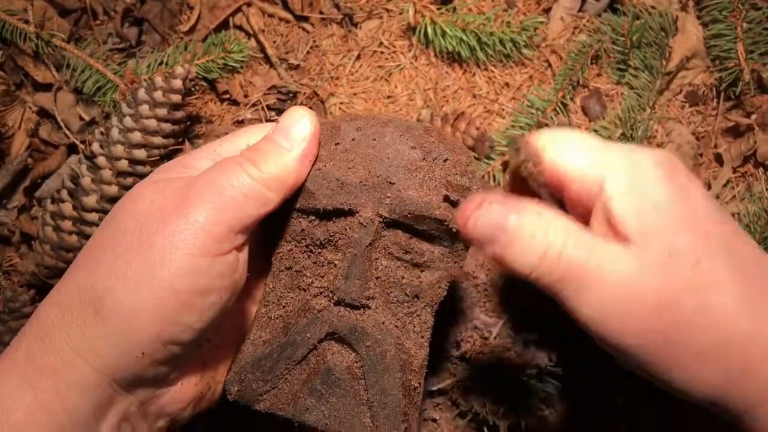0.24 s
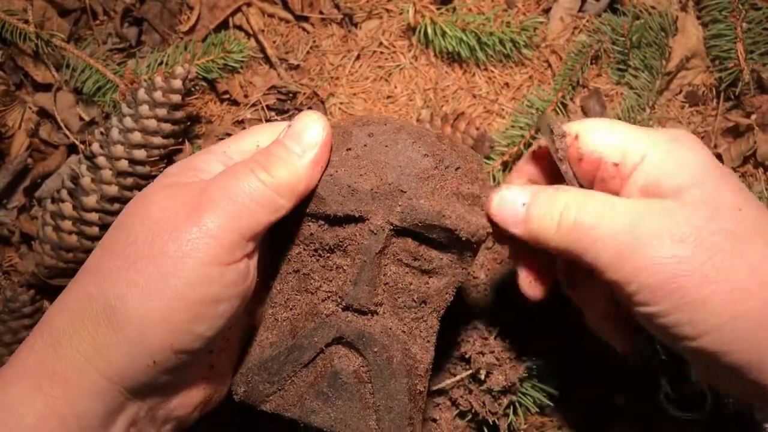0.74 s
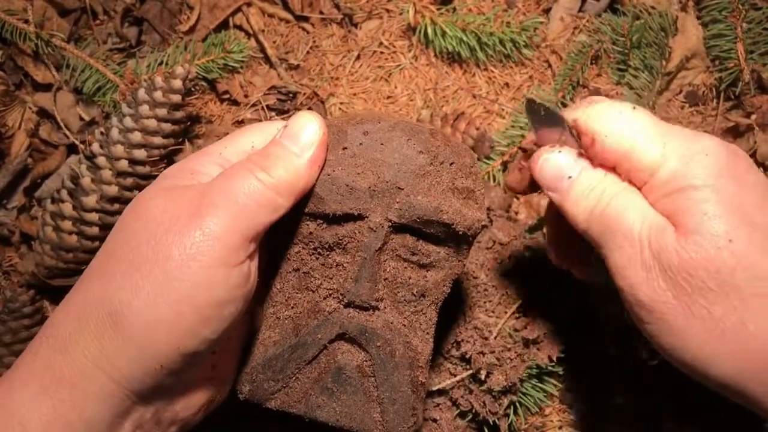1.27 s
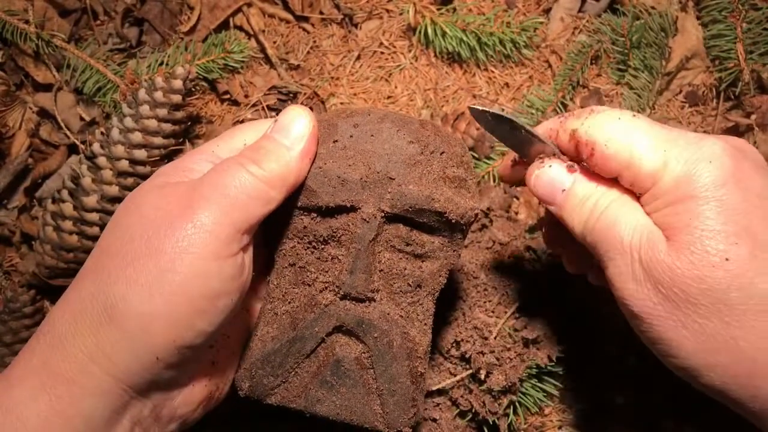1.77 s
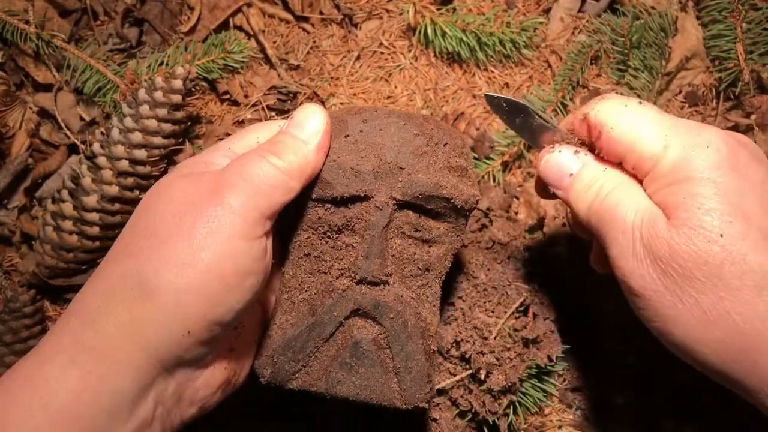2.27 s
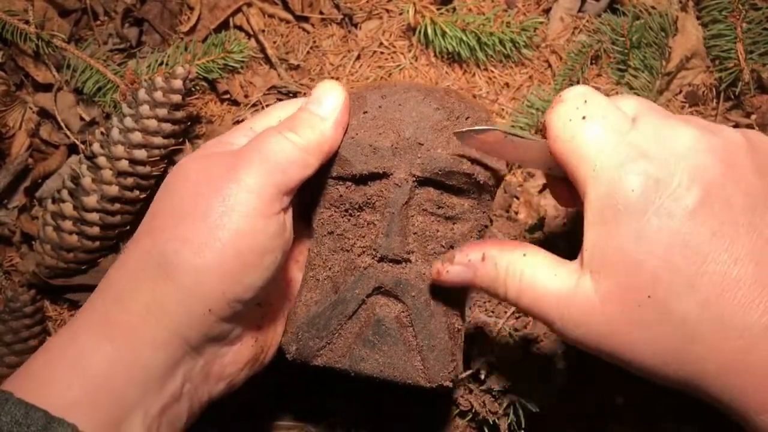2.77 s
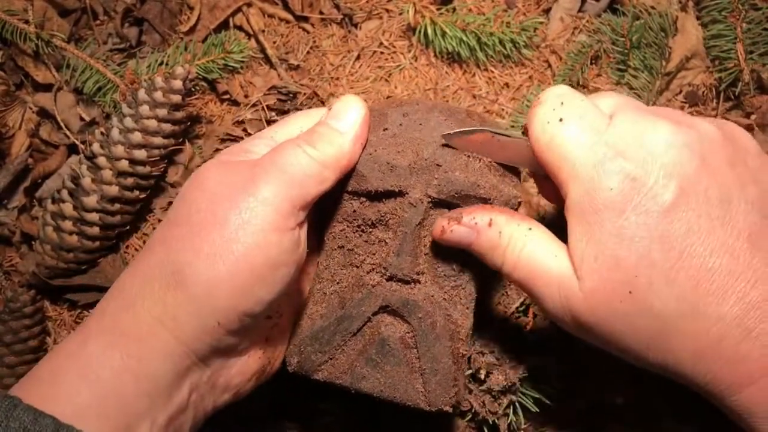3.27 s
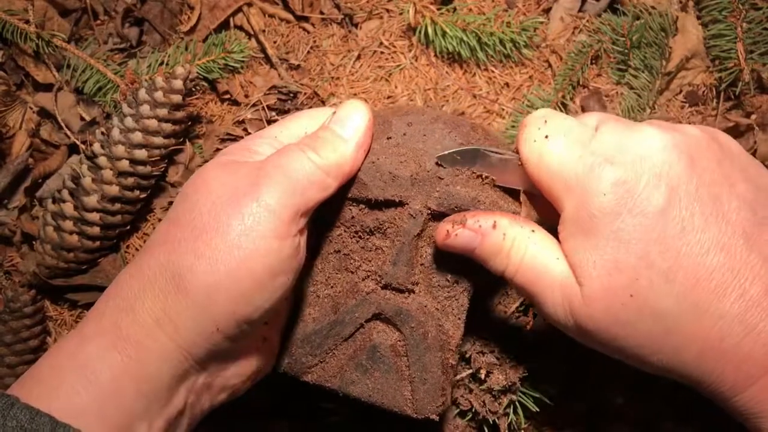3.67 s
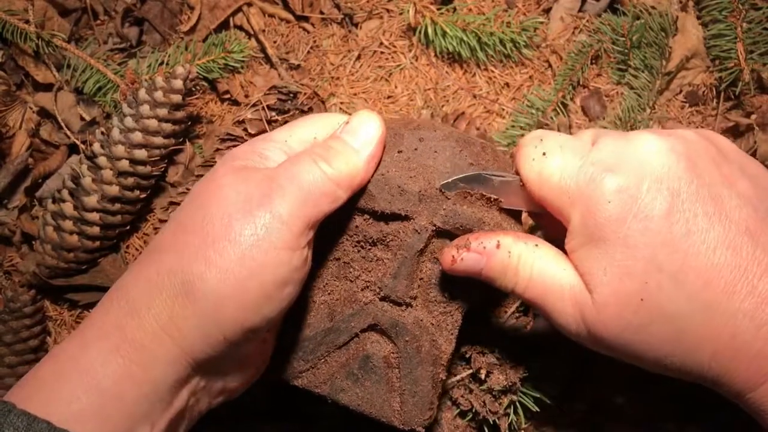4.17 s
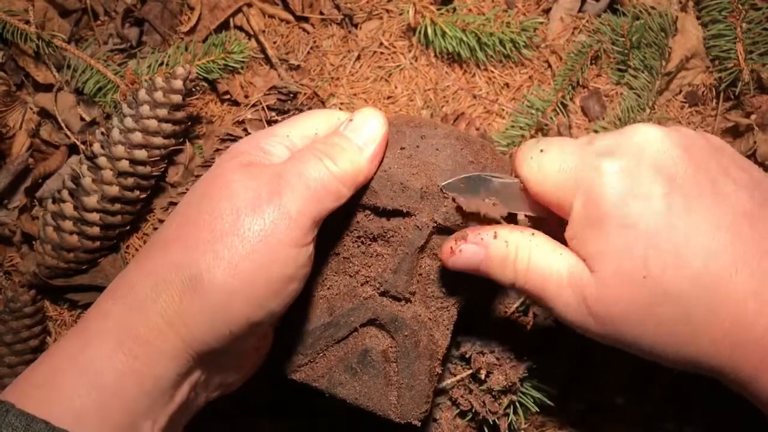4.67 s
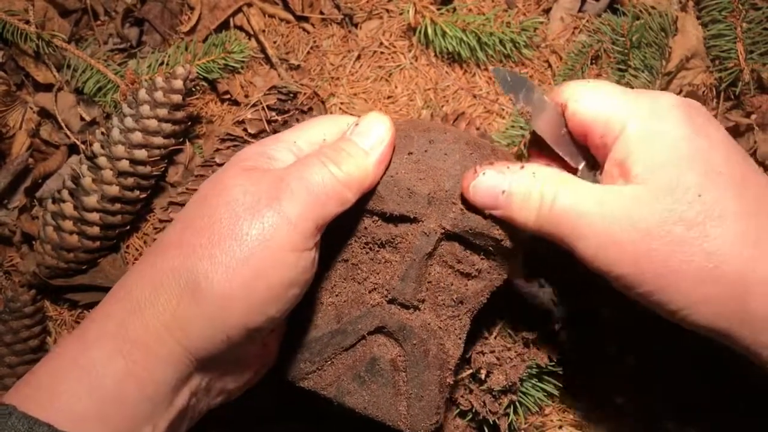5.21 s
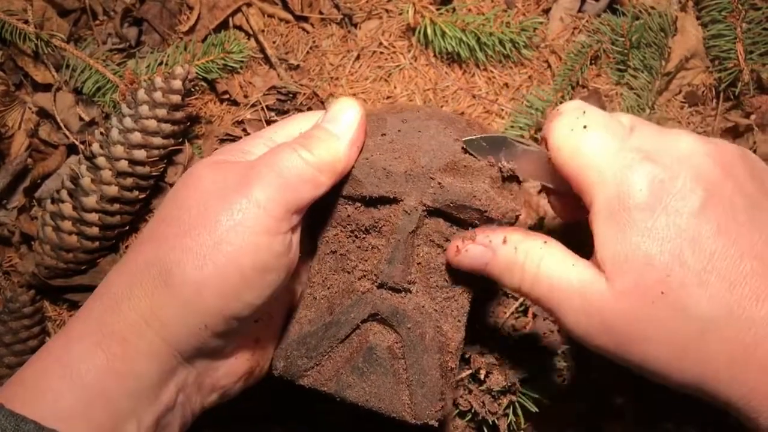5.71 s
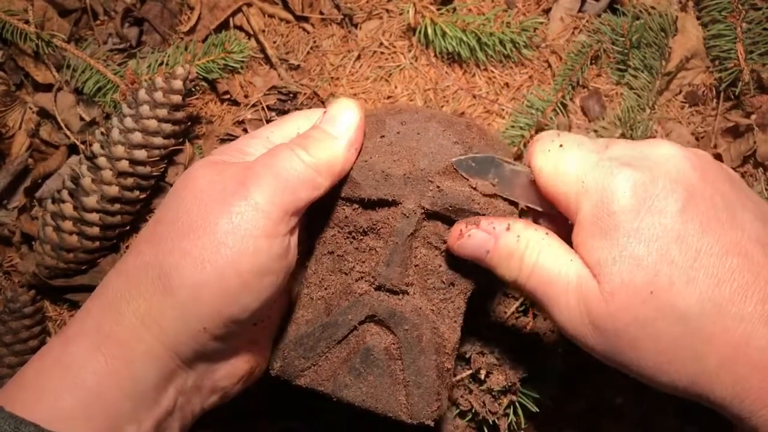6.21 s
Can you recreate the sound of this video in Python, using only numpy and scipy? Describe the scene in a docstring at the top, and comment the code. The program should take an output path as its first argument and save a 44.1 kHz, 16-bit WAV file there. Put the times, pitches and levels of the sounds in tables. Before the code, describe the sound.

A forest stream rushes steadily with small drops plinking and ticking close by, while gusts of wind rumble low against the microphone.

```python
"""In a forest, a stream rushes steadily while gusts of wind buffet the microphone.
The rush is noise shaped like countless merged bubbles, with single ringing bubbles on top.
Nearer by, small drops plink (a ringing bubble) and tick (a dry burst), over a fine patter.
The wind is a low rumble of eddies on the microphone that grows brighter as it blows harder."""
import sys
import numpy as np
from scipy import signal
from scipy.fft import rfft, irfft
from scipy.io import wavfile
from scipy.ndimage import uniform_filter1d

SR = 44100
rng = np.random.default_rng(int(sys.argv[2]) if len(sys.argv) > 2 else 0)


def inscribe(sig):
    """Save sig as 16-bit PCM at rate SR to the path in sys.argv[1].

    A 1-D sig is mono; a 2-D sig holds one channel per row.
    Samples are clipped to [-1, 1] before scaling.
    """
    pcm = np.round(np.clip(np.atleast_2d(sig).T, -1, 1) * 32767)
    wavfile.write(sys.argv[1], SR, pcm.astype(np.int16))


N = 284445  # length in samples


def undb(db):
    """Turn decibels into a gain."""
    return 10 ** (np.asarray(db) / 20)


def unit(x):
    """Scale a signal to an rms of one."""
    return x / np.sqrt(np.mean(x ** 2))


def curve(rows):
    """Join (time in s, value) rows by straight lines."""
    return np.interp(np.arange(N) / SR, *np.transpose(rows))


def spectrum_db(points, hz):
    """Read a level between (pitch_hz, level_db) points, on a log-frequency axis."""
    point_hz, point_db = np.transpose(points)
    return np.interp(np.log(hz + 1e-9), np.log(point_hz), point_db)


def colour(x, points):
    """Filter a signal by a spectrum, with no sound before its cause, so that clicks keep their attack."""
    log_gain = spectrum_db(points, np.linspace(0, SR / 2, N + 1)) * np.log(10) / 20
    # folding the cepstrum forward in time gives the minimum-phase filter
    cepstrum = irfft(log_gain)
    cepstrum[1:N] *= 2
    response = np.exp(rfft(cepstrum[:N], 2 * N))
    return irfft(rfft(x, 2 * N) * response)[:N]


def walk(rate):
    """Wander at random: levels held 1 / rate seconds, then smoothed twice; rms one."""
    hold = int(SR / rate)
    held = np.repeat(rng.standard_normal(N // hold + 1), hold)
    smooth = uniform_filter1d(uniform_filter1d(held, hold), hold)
    return unit(smooth[:N])


def add(out, start_s, sound):
    """Mix a short sound in at a given time."""
    i = int(np.clip(start_s * SR, 0, N - 1))
    out[i:i + len(sound)] += sound[:N - i]


# the colour of the white water: pitch_hz [Hz], level_db [dB per Hz, relative]
RUSH_SPECTRUM = [(100, -3), (250, 1.5), (400, -2.5), (650, -2), (950, 0.5), (1250, -0.1), (1550, -5),
                 (2100, -6), (3200, -16), (5000, -23), (6500, -25), (9000, -31), (13000, -29.5),
                 (16000, -35)]


def rush(flicker_db=1.0, flicker_rate=24):
    """Merged bubbles of the white water: coloured noise in which each size class flickers by itself."""
    wash = rfft(colour(rng.standard_normal(N), RUSH_SPECTRUM))
    hz = np.arange(len(wash)) * SR / N
    # size classes a third of an octave wide; the lowest takes everything below
    size_class = np.round(3 * np.log2(np.maximum(hz, 200) / 200))
    out = np.zeros(N)
    for k in np.unique(size_class):
        band = irfft(wash * (size_class == k), N)
        out += band * undb(flicker_db * walk(flicker_rate))
    return unit(out)


def bubble(hz, ring_s, glide, rise_s):
    """A damped air bubble whose pitch climbs as it nears the surface; its envelope peaks at one."""
    t = np.arange(int(6 * ring_s * SR) + 2) / SR
    shape = (1 - np.exp(-t / rise_s)) * np.exp(-t / ring_s)
    # the pitch climbs by the fraction `glide` in each ring_s
    cycles = hz * (t + glide * t ** 2 / (2 * ring_s))
    return shape / shape.max() * np.sin(2 * np.pi * cycles)


def babble(count=4500, low_hz=600, high_hz=4500, cycles=4, spread_db=3.5, slope_db=-2.0):
    """Single bubbles that stand out of the rush; small ones ring higher, shorter and softer."""
    out = np.zeros(N)
    for when, size, force, life in rng.random((count, 4)):
        hz = low_hz * (high_hz / low_hz) ** size
        ring_s = cycles * (.5 + life) / hz
        # many faint bubbles and a few strong ones; slope_db is per octave
        level_db = -spread_db * np.log(0.0033 + force) + slope_db * np.log2(hz / low_hz)
        add(out, when * N / SR, undb(level_db) * bubble(hz, ring_s, glide=0.0032, rise_s=0.00024))
    return unit(out)


# the strength of the water's flow: time_s [s], level_db [dB, before each layer's own level]
WATER_FLOW = [(0, -42), (1.1, -41.5), (1.8, -39.5), (2.3, -40.5), (3.3, -40.5), (4.7, -42.5), (5.4, -41),
              (6.45, -41.5)]


def stream(rush_db=0, babble_db=-10.5):
    """The flowing water: its rush and its single bubbles swell and sink together."""
    flow_db = curve(WATER_FLOW)
    return rush() * undb(flow_db + rush_db) + babble() * undb(flow_db + babble_db)


def droplet(hz, ring_s, shatter, chance):
    """A drop rings its main bubble; smaller ones, a moment later and at other pitches, fray the sound."""
    t = np.arange(int((6 * ring_s + .004) * SR)) / SR
    out = np.zeros(len(t))
    main = bubble(hz, ring_s, glide=.008, rise_s=ring_s / 6)
    out[:len(main)] += main
    for late, detune in chance.reshape(-1, 2):
        age = np.maximum(t - late * .003, 0)  # up to 3 ms late
        pitch_hz = min(hz * np.exp(.7 * (detune - .5)), 16000)
        fade = (1 - late / 2) * np.exp(-2 * age / ring_s)
        out += shatter * fade * np.sin(2 * np.pi * pitch_hz * age)
    return out


def spray(count, low_hz, high_hz, db, spread_db, slope_db):
    """A steady fall of drops at chance moments: (start_s, pitch_hz, level_db), tilted slope_db per octave."""
    when, size, force = rng.random((count, 3)).T
    # one drop in each equal slice of time
    start_s = (np.arange(count) + when) * N / SR / count
    hz = low_hz * (high_hz / low_hz) ** size
    level_db = db + spread_db * (2 * force - 1) + slope_db * np.log2(hz / low_hz)
    return list(zip(start_s, hz, level_db))


# near drops that trap a ringing bubble: start_s [s], pitch_hz [Hz], level_db [dB peak, before plink_db]
NEAR_PLINKS = [(0.1637, 2340, -31), (0.5978, 5040, -36.5), (0.627, 3080, -36), (0.9921, 5920, -35.5),
               (1.0592, 1890, -34.5), (1.3872, 1210, -30.5), (1.6594, 3460, -35), (1.7377, 3360, -37.5),
               (1.9074, 3400, -33), (2.4465, 2930, -32), (2.6942, 2930, -32), (2.7297, 1800, -30),
               (2.8144, 2470, -30.5), (3.334, 1240, -32.5), (3.9952, 3300, -29), (4.5069, 1640, -30),
               (4.6453, 2140, -33.5), (4.8742, 3000, -30.5), (5.06, 2780, -34), (5.357, 1310, -27)]


def plinks(plink_db=2.5, ring_s=0.0017, shatter=.3):
    """Near drops ring for a few milliseconds each, among fainter ones; their main bubble carries the pitch."""
    out = np.zeros(N)
    drops = NEAR_PLINKS + spray(count=28, low_hz=2710, high_hz=6720, db=-35.5, spread_db=3.0, slope_db=-3.5)
    for (start_s, hz, level_db), chance in zip(drops, rng.random((len(drops), 8))):
        drop = droplet(hz, ring_s, shatter, chance)
        add(out, start_s, undb(level_db + plink_db) * drop / np.abs(drop).max())
    return out


# near drops that burst with a dry tick:
# start_s [s], centre_hz [Hz], level_db [dB peak, before tick_db], decay_s [s]
NEAR_TICKS = [(0.0748, 10550, -33, .0003), (0.109, 8220, -34.5, .0005), (0.251, 7630, -25.5, .0006),
              (0.454, 9080, -30, 0.00026), (0.6337, 9600, -27, .0002), (0.698, 8920, -25.5, 0.0007),
              (2.2827, 13650, -35, .0009), (2.4236, 9000, -30.5, .0006), (2.9414, 6750, -29.5, 0.0017),
              (3.0609, 5800, -29.5, .0009), (3.6186, 8160, -32, 0.00016), (4.0824, 6700, -29.5, 0.00033),
              (4.115, 9370, -30, 0.00046), (4.5539, 10900, -26.5, 0.0014), (4.8418, 6700, -16.5, 0.00051),
              (5.582, 13260, -33, 0.0013), (5.7257, 10520, -28, 0.00031), (5.9511, 9450, -27.5, 0.00081),
              (6.0728, 10500, -30, 0.00038)]


def ticks(tick_db=-1.0, splash_s=0.0012, splash_hz=5600, top_hz=15000, chance_decay_s=0.00053):
    """A drop's impact: a damped ring and a bright splash; more fall at chance moments among the listed ones."""
    out = np.zeros(N)
    t = np.arange(SR // 100) / SR
    low_cut = signal.butter(5, splash_hz, "high", fs=SR, output="sos")
    top_cut = signal.butter(1, top_hz, fs=SR, output="sos")
    bright = np.vstack([low_cut, top_cut])
    chance_ticks = spray(count=15, low_hz=7700, high_hz=14900, db=-31.5, spread_db=6, slope_db=2)
    all_ticks = NEAR_TICKS + [(*drop, chance_decay_s) for drop in chance_ticks]
    for start_s, hz, level_db, decay_s in all_ticks:
        splash = .5 * rng.standard_normal(len(t)) * np.exp(-t / splash_s)
        ring = np.cos(2 * np.pi * hz * t) * np.exp(-t / decay_s)
        tick = signal.sosfilt(bright, splash + ring)
        add(out, start_s, undb(level_db + tick_db) * tick / np.abs(tick).max())
    return out


# the filter that colours the fine drops: pitch_hz [Hz], gain_db [dB]
PATTER_COLOUR = [(1000, -6), (2200, 5.5), (3050, 8.5), (3900, 9), (6300, 4.5), (7600, 2), (9500, 4),
                 (12000, 2), (14000, -6), (16000, -16)]


def patter(count=4200, low_hz=2200, high_hz=15000, spread_db=5.0, ring_s=0.0012):
    """Fine drops, from dry clicks to brief rings: countless faint ones and a few that stand out."""
    out = np.zeros(N)
    for row in rng.random((count, 10)):
        when, size, force, life = row[:4]
        hz = low_hz + (high_hz - low_hz) * size
        stretch = np.exp(3.4 * (life - .6))
        level_db = -spread_db * np.log(0.008 + force)
        drop = droplet(hz, ring_s * stretch, shatter=1.0, chance=row[4:])
        # a longer ring spreads the impact's energy and has a lower peak
        add(out, when * N / SR, undb(level_db) * drop / stretch ** .35)
    return unit(colour(out, PATTER_COLOUR))


def forest(x, scatter_db=-12):
    """The ground scatters a short, faint tail of noise behind each drop."""
    t = np.arange(SR // 10) / SR
    tail = rng.standard_normal(len(t)) * np.exp(-t / .005)
    return x + undb(scatter_db) * signal.fftconvolve(x, tail / np.linalg.norm(tail))[:N]


# the colour of the wind on the microphone: pitch_hz [Hz], level_db [dB per Hz, relative]
RUMBLE_SPECTRUM = [(12, -27), (22, -5.5), (42, .5), (64, 2.5), (82, -3), (110, -7), (160, -17),
                   (230, -27.5), (330, -41), (600, -66), (2000, -110)]


def wind(wind_db=-.5, bright_per_db=.5, knee_hz=140, eddy_s=0.059, buffet_db=2.16, buffet_rate=32):
    """Eddies on the microphone; a harder gust sheds smaller ones, which lifts the upper rumble."""
    gust_db, chop_db = airflow()
    gust_db = gust_db + buffet_db * walk(buffet_rate)
    eddies = unit(colour(rng.standard_normal(N), RUMBLE_SPECTRUM))
    # the gust, more than chance, sets how strong each run of eddies is
    power = uniform_filter1d(uniform_filter1d(eddies ** 2, int(eddy_s * SR)), int(eddy_s * SR / 2))
    eddies = unit(eddies / power ** .3)
    small = signal.sosfiltfilt(signal.butter(2, knee_hz, "high", fs=SR, output="sos"), eddies)
    lift = undb(bright_per_db * (gust_db - gust_db.mean()) + chop_db)
    return (eddies + (lift - 1) * small) * undb(gust_db + wind_db)


def gust_shape(start_s, length_s, attack_s=0.03, release_s=0.027):
    """A gust rises, holds and dies away; the rise is centred on its start."""
    t = np.arange(N) / SR - start_s
    rise = np.clip(t / attack_s + .5, 0, 1)
    return rise * np.exp(-np.maximum(t - length_s, 0) / release_s)


# gusts on the microphone: start_s [s], length_s [s], level_db [dB, before buffets and wind_db],
# chop_db [dB, small eddies against large ones, before the lift of a harder blow]
WIND_GUSTS = [(0.156, 0.13, -14.5, -1), (0.33, 0.19, -14.5, -3), (0.59, 0.025, -18, -2.5),
              (0.691, 0.18, -17.5, 6.5), (0.917, 0.1, -13, 0.5), (1.133, 0.24, -16, -0.5),
              (1.39, .14, -20, -5), (1.636, .17, -23, -1), (2.035, 0.36, -17.5, -0.5),
              (2.542, .21, -21.5, 14), (2.78, 0.12, -15, 0.5), (3.196, 0.45, -22, 4.5),
              (3.672, 0.24, -26, 1), (4.021, 0.03, -19, -25), (4.162, 0.16, -22, -10),
              (4.456, 0.12, -13, -3.5), (4.613, 0.31, -27, 3), (5.215, 0.12, -24, -5),
              (5.768, 0.16, -24, 6), (6.069, 0.023, -17, -5.5), (6.236, 0.19, -20, 4.5)]


def airflow(breeze_db=-26.5, breeze_chop_db=-0.5):
    """Gusts add their power to a light breeze; gives the level and the choppiness of the air, both in dB."""
    power = np.full(N, undb(breeze_db) ** 2)
    chop = power * breeze_chop_db
    for start_s, length_s, level_db, chop_db in WIND_GUSTS:
        gust = (undb(level_db) * gust_shape(start_s, length_s)) ** 2
        power = power + gust
        chop = chop + gust * chop_db
    return 10 * np.log10(power), chop / power


def scene(patter_db=-55.5):
    """Stream, near drops and wind at one microphone."""
    drops = plinks() + ticks() + patter() * undb(patter_db)
    return (stream() + forest(drops) + wind())[None]


# a narrow bump and two narrow dips in the treble: centre_hz [Hz], width_hz [Hz], gain_db [dB]
TREBLE_BANDS = [(2990, 73, 3), (4810, 200, -5.5), (10530, 650, -5)]


def record(dry, top_hz=15700):
    """Narrow bands shape the treble; the recorder cuts the top."""
    for hz, width_hz, gain_db in TREBLE_BANDS:
        band = signal.lfilter(*signal.iirpeak(hz, hz / width_hz, fs=SR), dry)
        dry = dry - (1 - undb(gain_db)) * band
    return signal.sosfilt(signal.ellip(8, .2, 70, top_hz, fs=SR, output="sos"), dry)


dry = scene()
out = record(dry)
inscribe(out)
```